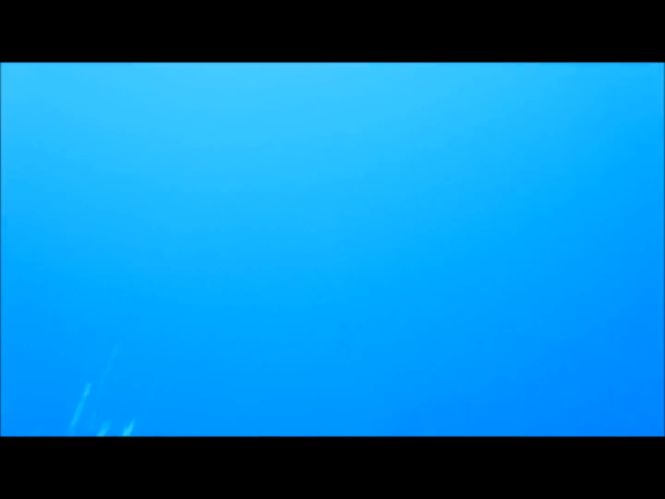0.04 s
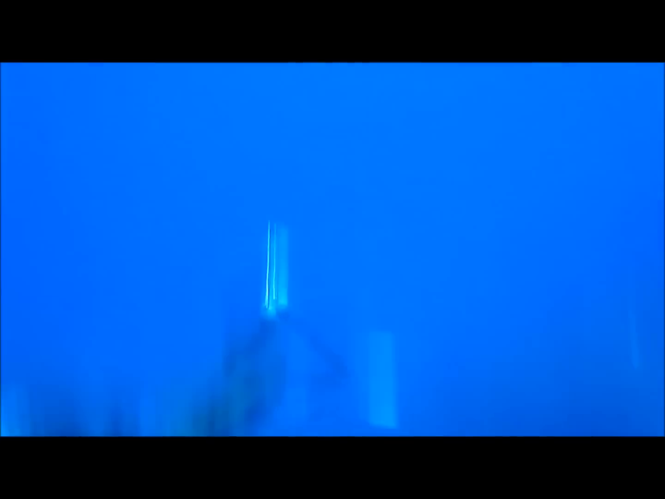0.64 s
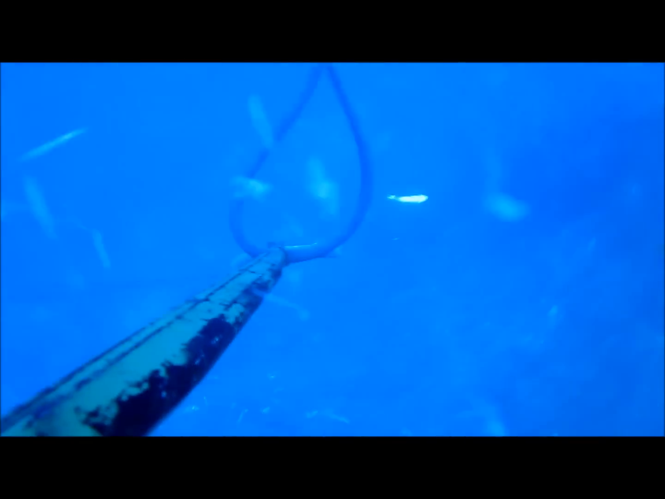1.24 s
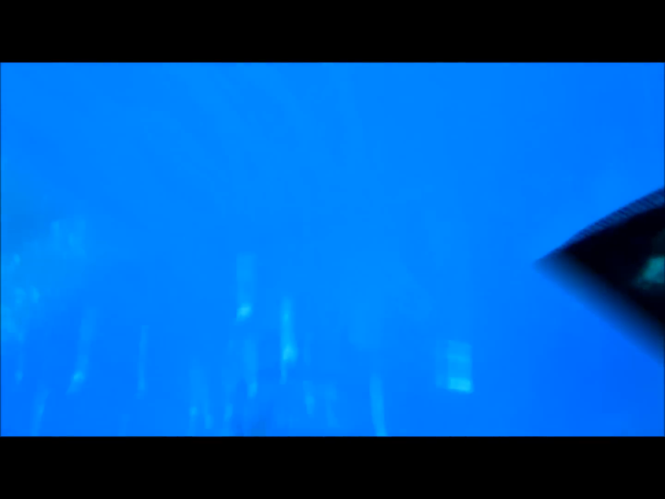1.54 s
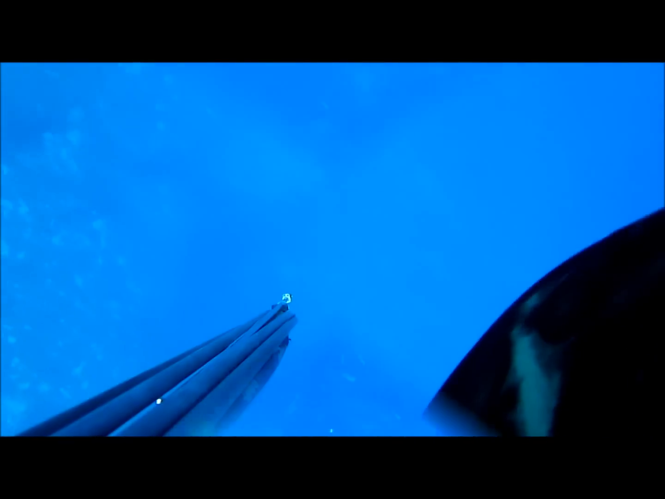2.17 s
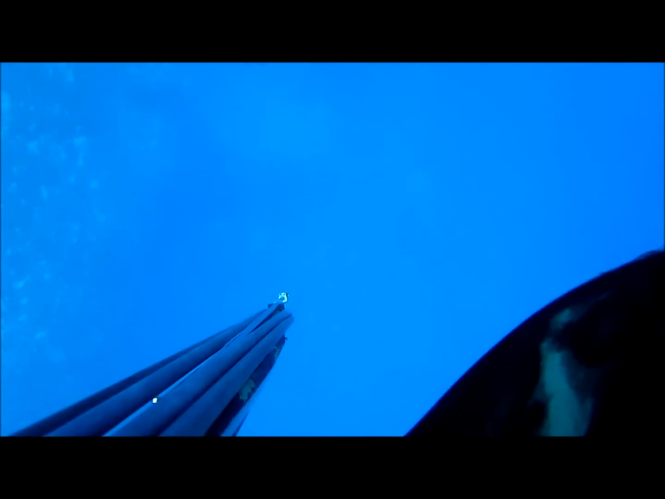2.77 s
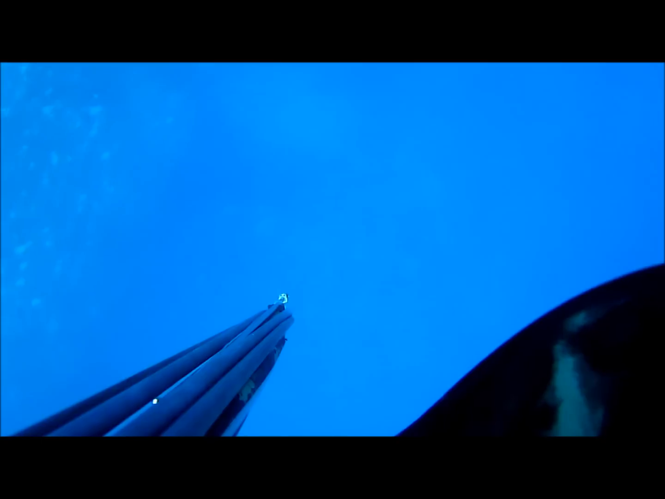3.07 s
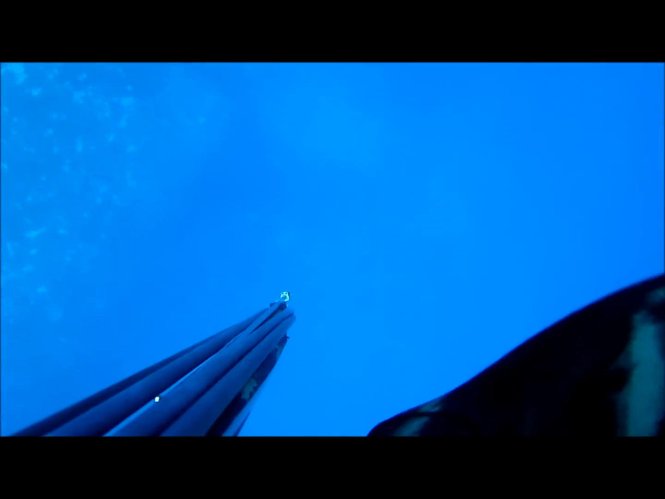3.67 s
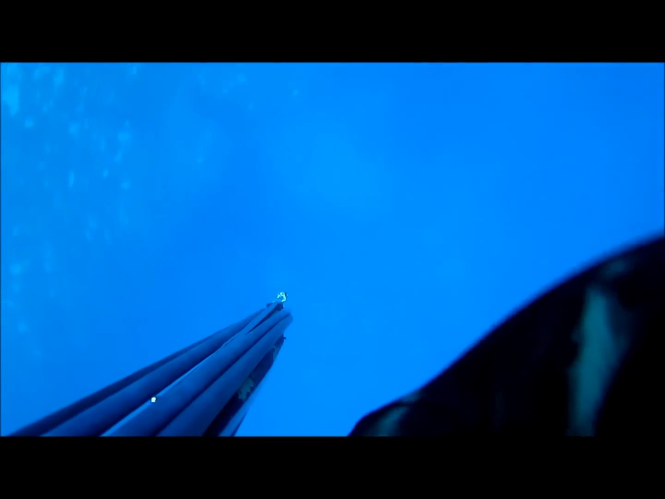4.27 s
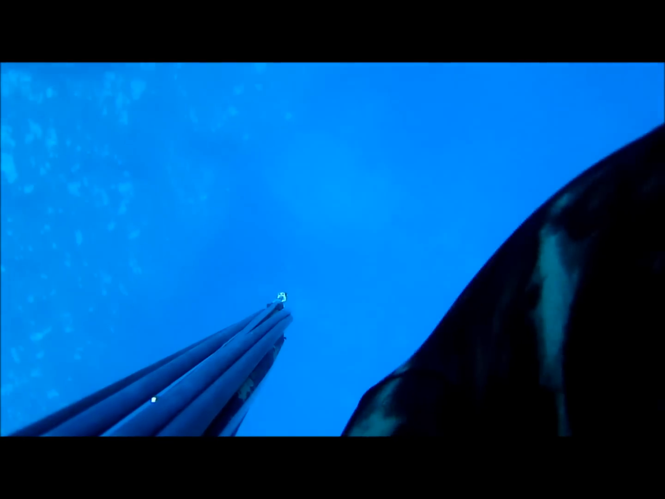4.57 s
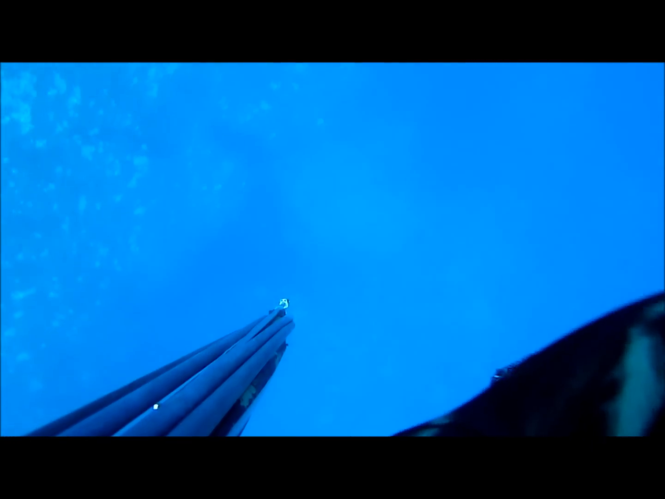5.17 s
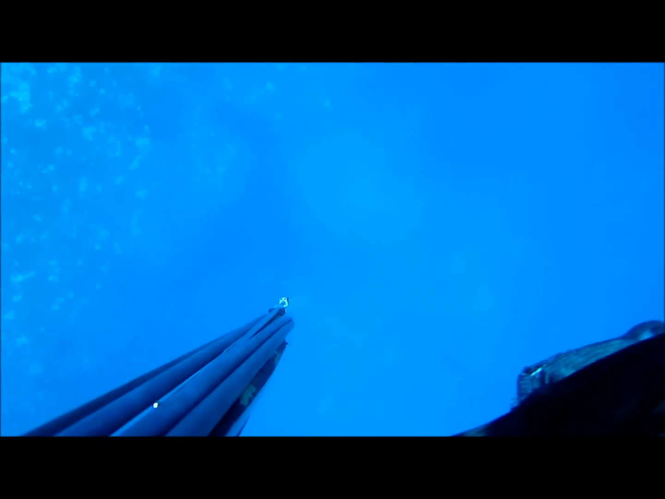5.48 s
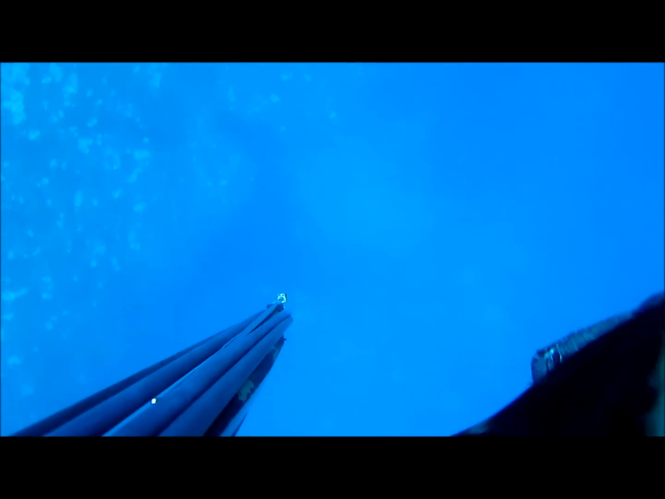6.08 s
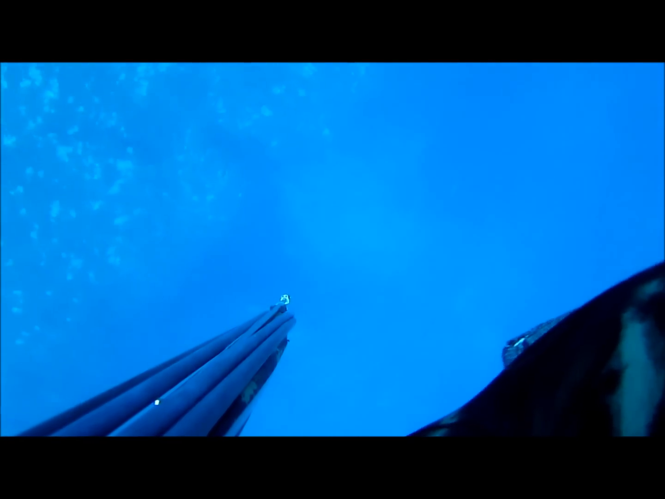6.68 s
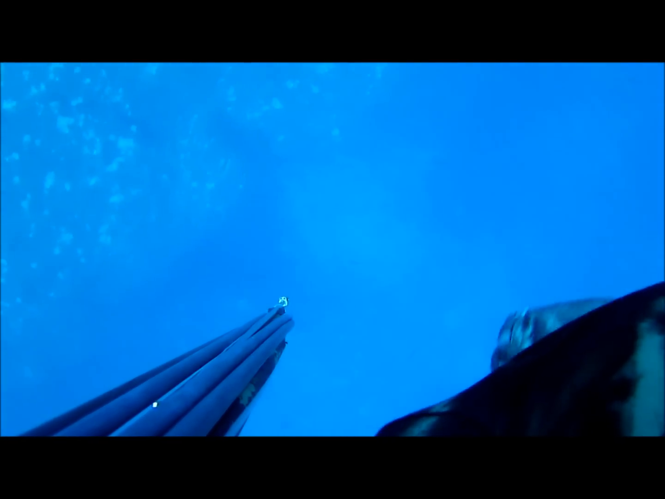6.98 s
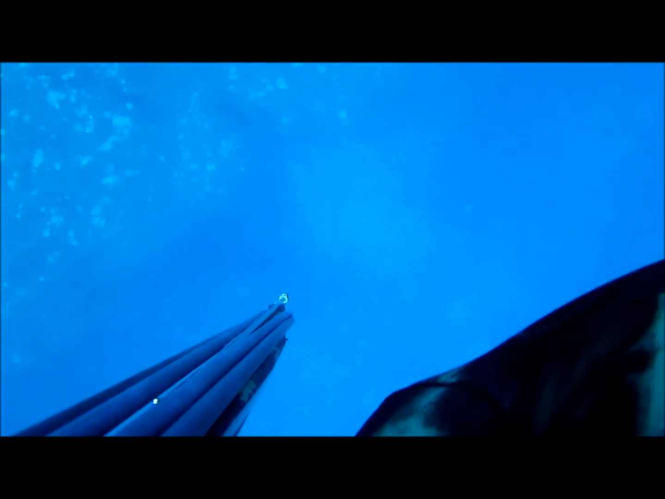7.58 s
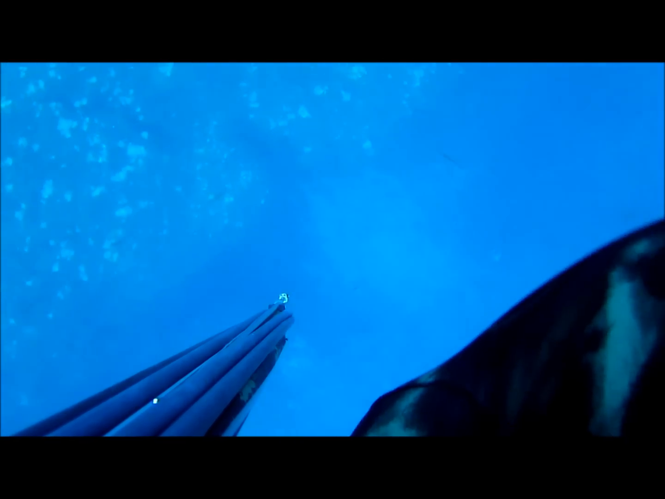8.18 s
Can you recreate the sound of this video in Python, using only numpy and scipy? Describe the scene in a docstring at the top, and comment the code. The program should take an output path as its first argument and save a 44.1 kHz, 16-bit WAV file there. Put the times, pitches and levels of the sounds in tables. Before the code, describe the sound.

Underwater, gear bumps loudly against the microphone and air bubbles away, then tiny shrimp clicks dot a quiet hiss and whine.

```python
"""A diver with a speargun slips under the sea, heard from inside a waterproof camera housing.
First gear knocks and rubs on the housing, ringing its modes and overloading the microphone.
Within a second trapped air escapes as a cloud of bubbles, each a small resonator. More knocks
follow, then a few last gurgles. From about 3 s the water is almost still: snapping shrimp
crackle over the hiss, whine and soft pips of the camera's electronics."""
import sys
import numpy as np
from scipy import signal
from scipy.fft import rfft, irfft
from scipy.io import wavfile
from scipy.ndimage import uniform_filter1d

SR = 44100
rng = np.random.default_rng(int(sys.argv[2]) if len(sys.argv) > 2 else 0)


def generate_wav(signal):
    """Clip the signal to [-1, 1] and save it as 16-bit WAV at the path in sys.argv[1]."""
    frames = np.transpose(np.atleast_2d(signal))
    scaled = np.clip(frames, -1, 1) * 32767
    pcm = np.round(scaled).astype(np.int16)
    wavfile.write(sys.argv[1], SR, pcm)


N = 371322
T = np.arange(N) / SR
FRAME_HZ = 29.97

# spectra of the dull and the bright hiss: f/Hz, relative level/dB
DULL_HISS_SPECTRUM = [(20, -2), (80, -3.5), (250, -5), (350, -4.5), (480, -7.5), (660, -11), (850, -3),
                      (1100, -6), (1350, -8), (1600, -4.5), (2050, -5.5), (2600, -10.5)]
BRIGHT_HISS_SPECTRUM = [
    (1530, -38), (2600, -9), (2810, -0.5), (3340, 4), (3950, -3), (4200, 1.5), (4530, -2), (4920, -0.5),
    (6830, -5.5), (7830, -1.5), (8320, -7), (9910, -0.5), (10700, -6.5), (14200, -16), (16000, -21)]
# humps and hollows due to the air in the housing: f/Hz, width/Hz, gain/dB
CAVITY_BANDS = [(830, 243, 4), (1360, 25, -12), (2540, 53, -0.5), (5000, 300, 2.5), (8340, 420, -3.5),
                (9930, 310, 7.5), (10210, 600, -11.5)]
# sensor read-out tones: f/Hz, early level/dB, late level/dB
WHINE_TONES = [(1606, -56, -59), (1894, -51, -49), (2181, -55, -62), (2468, -57, -66), (2756, -64, -65),
               (4203, -66, -62), (4779, -64, -66), (7595, -65, -67), (7882, -66, -68), (9617, -68, -73),
               (9904, -65, -65.5), (10191, -72, -73), (15735, -77, -82)]
# gain applied to hiss and whine: t/s, gain/dB
ELECTRONICS_GAIN = [(.08, 1), (.17, -5), (.3, 4.5), (.6, -1), (.81, -6.5), (.95, 1), (1.15, -6),
                    (1.42, 3.5), (2.8, 2.5), (2.85, -1.27), (8.42, -0.17)]

# wall modes that a snap excites: f/Hz, level/dB, t60/s
WALL_MODES = [(2935, -4, 0.01), (3405, -4, 0.0081), (3820, -13.5, 0.0044), (5035, -6.5, 0.01),
              (6330, -12, 0.015), (7500, -21, 0.0026), (10100, -16.5, .003)]
# filter on each snap: f/Hz, gain/dB
SNAP_RESPONSE = [(1200, -30), (2400, -36), (2900, 3.5), (5200, 3), (8000, -2.5), (12000, -4.5),
                 (15500, -15)]
# snaps of nearby shrimp: t/s, level/dB
NEAR_SNAPS = [(3.4, -27.5), (3.4532, -24), (3.4895, -27), (3.5499, -27.5), (3.6878, -28), (3.9438, -32),
              (4.3344, -19), (4.5456, -34), (4.616, -23), (4.907, -24), (5.1397, -25), (5.9793, -32),
              (6.5905, -22.5), (6.903, -24), (6.976, -32), (7.1377, -28), (7.2769, -25.5), (8.2742, -29)]

# envelopes of water pushing on the housing and of fine bubbling: t/s, level/dB
FLOW_LEVEL = [(0, -38), (.18, -33.5), (.27, -21), (.45, -30), (1.55, -37.5), (1.85, -28.5), (2.08, -49),
              (2.45, -40), (3, -55)]
WASH_LEVEL = [(0, -38.5), (.17, -35.5), (.43, -28), (.82, -38), (1.65, -38), (1.88, -41), (2.0, -40),
              (2.78, -38.5), (2.9, -64)]
# faint swirls as the diver shifts: t/s, duration/s, level/dB
SWIRLS = [(3.38, 0.43, -50.5), (4.15, 0.24, -54), (5.11, 0.074, -48), (6.9, 0.11, -51)]
# gurgles of left-behind air: t/s, relative level/dB
GURGLES = [(1.852, -12.5), (1.886, -18.5), (1.912, -18.5), (1.974, -22), (2.13, -14.5), (2.315, -15.5),
           (2.392, -19), (2.400, -17.5), (2.436, -12), (2.466, -18), (2.494, -23), (2.518, -27),
           (2.545, -25), (2.701, -27.5)]
# envelope of the escaping air: t/s, big-bubble level/dB, small-bubble level/dB
CLOUD_LEVELS = [(0.82, -55, -56), (0.846, -23.5, -35.5), (0.906, -15.5, -29), (1.018, -15, -20.5),
                (1.05, -22, -32.5), (1.106, -15.5, -29.5), (1.318, -17.5, -29), (1.326, -19.5, -32.5),
                (1.528, -33.5, -25.5), (1.57, -41, -33)]
# short rising bloops, from large bubbles and brief hollow rings of the housing:
# t/s, starting f/Hz, duration/s, level/dB
BLOOPS = [(.113, 217, 0.053, -15.5), (0.172, 217, 0.098, -28), (0.248, 696, .022, -12),
          (0.284, 269, 0.038, -14.5), (0.302, 1640, 0.0094, -10.5), (0.333, 1750, 0.0077, -23),
          (.428, 248, 0.025, -17), (.532, 490, 0.023, -12), (0.649, 139, 0.046, -16.5),
          (0.905, 516.5, .046, -10.5), (.945, 470.5, 0.077, -12), (1.09, 475, 0.061, -11),
          (1.119, 540.6, 0.0634, -14.5), (1.151, 1230, 0.02, -17), (1.427, 1220, 0.046, -21.5),
          (1.585, 123.5, 0.039, -10), (1.608, 178, 0.029, -12), (1.788, 1145, 0.022, -17)]
# spectral shapes of the moving water and the bubble swarms: f/Hz, relative level/dB
FLOW_SPECTRUM = [(11, -38), (18, 4), (65, 8.5), (193, -3.5), (254, -3.5), (317, -7.5), (400, -13),
                 (520, -48), (880, -120)]
SWIRL_SPECTRUM = [(50, -10), (90, 2), (200, -4), (345, 6.5), (450, -2)]
WASH_SPECTRUM = [(120, -50), (200, -32), (279, -29), (335, -1), (377, -6.5), (525, 9), (673, -7), (741, -1),
                 (825, 3), (1060, -9.5), (1250, -7), (1430, -3), (2520, -23), (2600, -9), (3380, -29),
                 (5720, -120)]
GURGLE_SPECTRUM = [(300, -12.5), (520, 6.5), (660, -6), (820, 9.5), (1000, -5.5), (1400, -7), (1800, -16.5)]
CLOUD_SPECTRUM = [(88, -53), (150, -28.5), (238, -7.5), (273, -19), (336, -3.5), (419, -9), (533, 3.5),
                  (701, -16), (846, -6.5), (1020, -15.5), (1440, -14.5), (1930, -27), (3510, -34),
                  (5030, -46), (9000, -53), (11700, -94), (19800, -120)]

# gear brushing along the housing: t/s, duration/s, level/dB
SCUFFS = [(0.012, .016, -14), (.221, 0.01, -26), (.250, 0.019, -19), (.266, 0.051, -17), (.412, 0.044, -20),
          (0.482, 0.017, -19)]
# spectrum of that friction: f/Hz, relative level/dB
SCUFF_SPECTRUM = [(88, -32), (150, -2), (283, 2.5), (787, -0.5), (1030, -9.5), (2020, -16), (2400, -20.5),
                  (4290, -18.5), (11500, -40.5), (15000, -53)]
# shoves of water as the camera is jerked about: t/s, peak level/dB
SHOVES = [(.034, -7), (0.092, -10.5), (.306, -16), (0.552, -13), (1.493, -24), (1.635, -13), (1.813, -17),
          (2.338, -23), (2.444, -26), (3.871, -36)]
# modes of the struck housing: f/Hz, level/dB, t60/s
HOUSING_MODES = [(286, -8.5, 0.025), (544, -8.5, 0.042), (800, 1, 0.0098), (996, -5, 0.011),
                 (1390, -10, 0.017), (1897, -6.5, 0.015), (2260, -16, 0.001), (2800, -3, 0.011),
                 (3750, -3, 0.0085), (4380, -1.5, 0.0096), (5870, -6, 0.011), (7950, -13, 0.017)]
# blows on the housing: t/s, peak level of the ring/dB, contact time/ms
KNOCKS = [(0.0208, -6, 0.2), (0.0308, -3, 0.34), (.081, -4.5, 0.34), (.093, 7.5, 0.26), (.1037, 8, 0.049),
          (.117, -12, 0.21), (0.2371, -9, 0.27), (.307, -11, 0.58), (.418, -12, 0.069),
          (.4973, -8.5, 0.0093), (.531, 7, 0.058), (.554, -2, 0.13), (.58, -14, 0.093), (.629, -4.5, 0.48),
          (0.6398, 3, 0.22), (0.66, -13, 0.33), (.7412, 12, 0.1), (.75, -1.5, .05), (.758, 3.5, 0.029),
          (.788, -5.5, .009), (1.311, -3.5, 0.038), (1.582, 0.5, 0.45), (1.609, 6.5, 0.15),
          (1.629, 7.5, 0.046), (1.6374, -3.5, 0.24), (1.752, 3.5, .12), (1.775, -6.5, 0.35),
          (1.815, -6.5, 0.059)]


def from_db(db):
    """Amplitude ratio: tenfold for every 20 dB."""
    return 10 ** (np.asarray(db) / 20)


def envelope(rows, column=1):
    """Amplitude envelope, interpolated in dB; silent outside the curve."""
    rows = np.array(rows)
    return from_db(np.interp(T, rows[:, 0], rows[:, column], left=-120, right=-120))


def add(track, start_s, sound):
    """Superposition: a sound adds linearly to the track."""
    i = int(np.clip(round(start_s * SR), 0, N - 1))
    track[i:i + len(sound)] += sound[:N - i]


def swells(rows):
    """Half-sine envelopes from rows of t/s, duration/s, level/dB."""
    out = np.zeros(N)
    for start_s, duration, db in rows:
        add(out, start_s, from_db(db) * np.sin(np.linspace(0, np.pi, int(duration * SR))))
    return out


def coloured(x, spectrum, humps=()):
    """Spectral shaping with 36 dB/octave skirts and optional Gaussian humps; rms 1."""
    hz = np.maximum(np.arange(N // 2 + 1) * SR / N, 1)
    knot_hz, knot_db = np.transpose(spectrum)
    octaves_outside = np.abs(np.log2(hz / np.clip(hz, knot_hz[0], knot_hz[-1])))
    gain_db = np.interp(np.log(hz), np.log(knot_hz), knot_db) - 36 * octaves_outside
    for centre, width, hump_db in humps:
        gain_db += hump_db * np.exp(-.5 * ((hz - centre) / width) ** 2)
    shaped = irfft(rfft(x) * from_db(gain_db), N)
    return shaped / np.sqrt(np.mean(shaped ** 2) + 1e-20)


def noise(spectrum, humps=()):
    """Filtered Gaussian noise; rms 1."""
    return coloured(rng.standard_normal(N), spectrum, humps)


def evened(x, span_s):
    """Division by the running rms holds the level at 1 and keeps the finer grain."""
    power = uniform_filter1d(x ** 2, int(span_s * SR))
    return x / np.sqrt(np.abs(power) + 1e-9)


def modal_ring(modes, spread_db, samples):
    """Free vibration: a sum of damped modes, each varied at random in level and frequency."""
    hz, db, t60 = np.array(modes).T[:, :, None]
    hz = hz + rng.uniform(-1, 1, hz.shape) * np.minimum(.5 / t60, hz / 10)
    db = db + spread_db * rng.standard_normal(db.shape)
    t = T[:samples]
    return np.sum(from_db(db - 60 * t / t60) * np.sin(2 * np.pi * hz * t), axis=0)


def swarm(low_hz, high_hz, cycles, rise, spread_db, rush_db, count, span_s=3):
    """Bubble resonance: randomly born damped oscillators rise in pitch; distant ones merge to a rush."""
    out = np.zeros(N)
    for birth, pitch, size, life in rng.random((count, 4)):
        hz = low_hz + (high_hz - low_hz) * pitch
        t60 = cycles * (.5 + life) / hz
        t = T[:int(t60 * SR)]
        onset = 1 - np.exp(-hz * t / 2)
        amplitude = np.sqrt(hz) * from_db(spread_db * size - 60 * t / t60) * onset
        add(out, span_s * birth, amplitude * np.sin(2 * np.pi * hz * t * (1 + rise * t / t60)))
    rush = from_db(rush_db) * noise([(low_hz, 0), (high_hz, 0)])
    return out / np.std(out[T < span_s]) + rush


def hiss():
    """Cavity resonance: the air in the housing colours broadband noise."""
    dull = from_db(-46) * noise(DULL_HISS_SPECTRUM, CAVITY_BANDS)
    bright = from_db(-48) * noise(BRIGHT_HISS_SPECTRUM, CAVITY_BANDS)
    return dull + bright


def whine(flat_hz=11.1, colour_change_s=2.83):
    """Phase modulation: read-out tones run slightly flat and jump back at each frame, so they purr."""
    lag_cycles = flat_hz * (T % (1 / FRAME_HZ))
    out = np.zeros(N)
    for hz, early_db, late_db in WHINE_TONES:
        rms = np.where(T < colour_change_s, from_db(early_db), from_db(late_db))
        out += rms * np.sqrt(2) * np.sin(2 * np.pi * (hz * T - lag_cycles + rng.random()))
    return out


def soft_pips(pip_hz=880, t60=0.02, clock_hz=12.607, overlap_cycles=0.17):
    """Beating: the electronics tick twice a frame, louder when in step with a second clock."""
    out = np.zeros(N)
    for start_s in np.arange(.009, T[-1], 1 / (2 * FRAME_HZ)):
        cycles_apart = (start_s * clock_hz + .5) % 1 - .5
        coincidence = np.exp(-(cycles_apart / overlap_cycles) ** 2)
        pip = modal_ring([(pip_hz, 0, t60)], spread_db=1.5, samples=1500)
        add(out, start_s, from_db(-47 + 10 * coincidence) * pip)
    return out


def snap(echo_db=-4, echo_s=0.0042, scatter_s=0.0028):
    """Pressure-release reflection: a snap rings the wall, then its echo off the surface, inverted."""
    ring = modal_ring(WALL_MODES, spread_db=7, samples=1000)
    t = T[:len(ring)]
    scatter = rng.standard_normal(len(t)) * np.exp(-t / scatter_s)
    response = from_db(np.interp(np.fft.rfftfreq(len(t), 1 / SR), *np.transpose(SNAP_RESPONSE)))
    taper = (1 - np.exp(-t / 0.00054)) * (1 - t / t[-1])
    direct = irfft(rfft(ring + scatter) * response) * taper
    echo = np.interp(t - echo_s * rng.uniform(.65, 1.5), t, direct, left=0)
    return (direct - from_db(echo_db) * echo) / np.abs(direct).max()


def shrimp(near_gain_db=-0.5, far_db=-40, far_count=500):
    """Superposed impulses: a few close snaps stand out from the random crackle of many far ones."""
    out = np.zeros(N)
    for start_s, db in NEAR_SNAPS:
        add(out, start_s, from_db(db + near_gain_db) * snap())
    for when, nearness in rng.random((far_count, 2)):
        add(out, when * T[-1], from_db(far_db + 10 * nearness ** 2) * snap())
    return out


def swirls():
    """Flow noise swells and fades as the diver shifts."""
    return swells(SWIRLS) * noise(SWIRL_SPECTRUM)


def flow():
    """Pressure fluctuations of the water on the housing make a low rumble."""
    return envelope(FLOW_LEVEL) * evened(noise(FLOW_SPECTRUM), span_s=0.065)


def wash():
    """Strongly damped bubble resonances overlap as a froth in the stirred water."""
    froth = swarm(165, 2650, cycles=12, rise=0.083, spread_db=28, rush_db=-9.5, count=4500)
    return envelope(WASH_LEVEL) * evened(coloured(froth, WASH_SPECTRUM), span_s=0.035)


def gurgles(gain_db=-6.5, swell_s=0.0039, linger_db=-13, linger_s=0.027):
    """Amplitude modulation of a bubble swarm: left-behind air escapes in short bursts."""
    t = T[:SR // 7]
    burst = t / swell_s * np.exp(1 - t / swell_s)
    tail = from_db(linger_db) * (1 - np.exp(-t / swell_s)) * np.exp(-t / linger_s)
    flares = np.zeros(N)
    for start_s, db in GURGLES:
        add(flares, start_s, from_db(db + gain_db) * (burst + tail))
    bubbles = swarm(292.6, 1828, cycles=21.8, rise=0.18, spread_db=11, rush_db=-20.5, count=2500)
    return flares * evened(coloured(bubbles, GURGLE_SPECTRUM), span_s=0.0059)


def air_cloud():
    """Resonant frequency falls with bubble size: big, low bubbles lead and small, high ones linger."""
    big = swarm(165.8, 1122, cycles=35, rise=0.1, spread_db=9, rush_db=-3.5, count=3000)
    small = swarm(1111, 8340, cycles=87, rise=0.055, spread_db=16, rush_db=-7, count=9000)
    big = evened(coloured(big, CLOUD_SPECTRUM), span_s=0.019) * envelope(CLOUD_LEVELS, column=1)
    small = evened(coloured(small, CLOUD_SPECTRUM), span_s=0.035) * envelope(CLOUD_LEVELS, column=2)
    return from_db(-0.5) * big + from_db(2) * small


def bloops(rise=0.267, wobble_depth=0.37):
    """Resonance: large bubbles and brief hollow rings of the housing sound as short rising bloops."""
    out = np.zeros(N)
    for start_s, hz, duration, db in BLOOPS:
        age = np.linspace(0, 1, int(duration * SR))
        cycles = np.cumsum(hz * (1 + rise * age)) / SR
        wobble = wobble_depth * np.interp(cycles / 3, np.arange(64), rng.standard_normal(64))
        amplitude = from_db(db) * np.sin(np.pi * age) * (1 + wobble)
        add(out, start_s, amplitude * np.sin(2 * np.pi * cycles + wobble))
    return out


def scuffs(unevenness_db=4):
    """Stick-slip friction: rubbing is a dense run of tiny slips of uneven size."""
    slips = rng.standard_normal(N) * from_db(unevenness_db * np.minimum(rng.exponential(1, N), 5))
    return coloured(slips, SCUFF_SPECTRUM) * swells(SCUFFS)


def shoves(flex_hz=84):
    """Forced motion: each shove of water flexes the housing in and out about once."""
    out = np.zeros(N)
    t = T[:SR // 10] - .05
    flex = np.cos(2 * np.pi * flex_hz * t) * np.exp(-(1.9 * flex_hz * t) ** 2)
    for peak_s, db in SHOVES:
        add(out, max(peak_s + t[0], 0), from_db(db) * flex[t > -peak_s])
    return out


def knocks(usual_contact_ms=0.12, crack_s=0.0099, thump_t60=0.074):
    """Impact excitation: longer contact favours lower modes and jolts the housing more on its mount."""
    out = np.zeros(N)
    t = T[:4000]
    stiff_wall = signal.butter(2, 240, "high", fs=SR, output="sos")
    damped_wall = signal.butter(1, 9000, "low", fs=SR, output="sos")
    mode_hz, mode_db, mode_t60 = np.transpose(HOUSING_MODES)
    for start_s, db, contact_ms in KNOCKS:
        softness = np.log2(contact_ms / usual_contact_ms)  # doublings of the contact time
        favoured_hz = 864 / 2 ** (0.4 * softness)
        excited_db = mode_db - 6.5 * np.abs(np.log2(mode_hz / favoured_hz))
        ring = modal_ring(np.transpose([mode_hz, excited_db, mode_t60]), spread_db=1.4, samples=len(t))
        crack = from_db(-27) * rng.standard_normal(len(t)) * np.exp(-t / crack_s)
        impulse_response = signal.sosfilt(damped_wall, ring + crack)
        force = t * np.exp(-t * 1000 / contact_ms)
        knock = signal.sosfilt(stiff_wall, signal.fftconvolve(impulse_response, force)[:len(t)])
        thump_hz = 210.4 / 2 ** (0.353 * max(softness, 0))
        thump_db = -19.5 + 9.5 * softness - 60 * t / thump_t60  # relative to the knock's peak
        thump = from_db(thump_db) * np.sin(2 * np.pi * thump_hz * t) * (1 - np.exp(-t / 0.0036))
        add(out, start_s, from_db(db) * (knock / np.abs(knock).max() + thump))
    return out


def scene():
    """Superposition: all sources sum at one microphone inside the housing."""
    handling = knocks() + shoves() + scuffs()
    underwater = bloops() + air_cloud() + wash() + flow() + gurgles() + swirls() + shrimp()
    electronics_gain = from_db(np.interp(T, *np.transpose(ELECTRONICS_GAIN)))
    electronics = (hiss() + whine()) * electronics_gain + soft_pips()
    return (electronics + underwater + handling)[None]


def record(dry, cutoff_hz=16100):
    """Saturation rounds off the hardest knocks; a steep low-pass filter cuts the top."""
    overloaded = dry / (1 + dry ** 8) ** (1 / 8)
    low_pass = signal.ellip(10, .1, 80, cutoff_hz, fs=SR, output="sos")
    return signal.sosfilt(low_pass, overloaded)


dry = scene()
out = record(dry)
generate_wav(out)
```